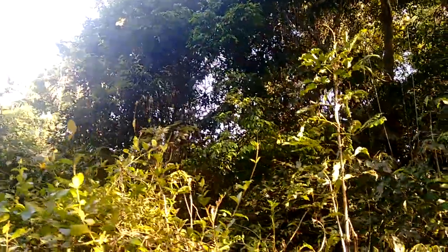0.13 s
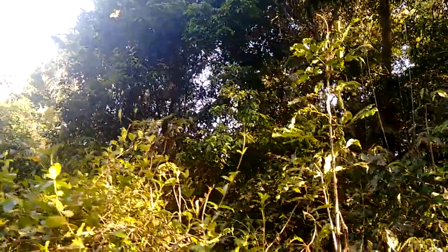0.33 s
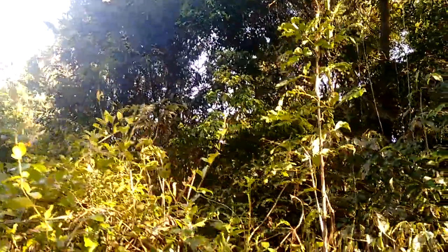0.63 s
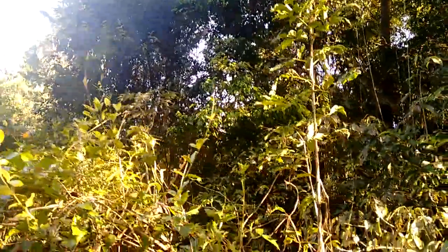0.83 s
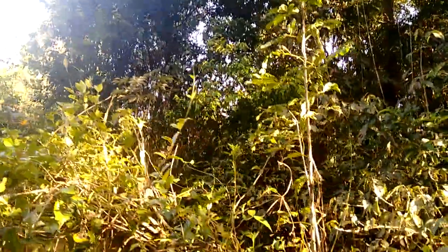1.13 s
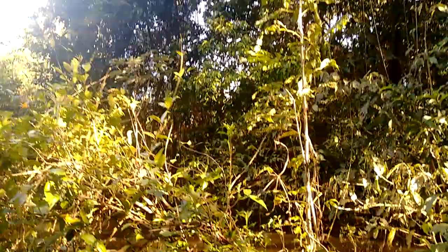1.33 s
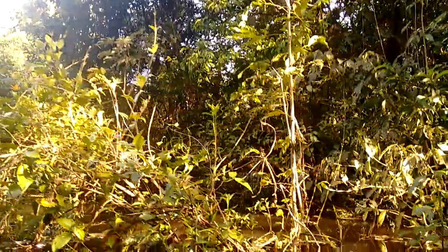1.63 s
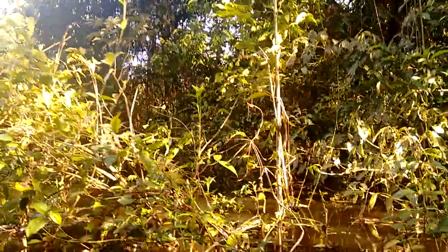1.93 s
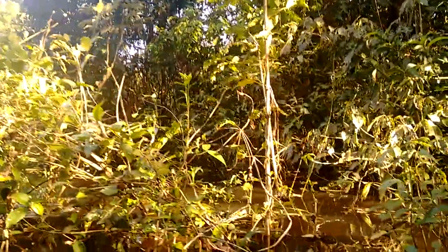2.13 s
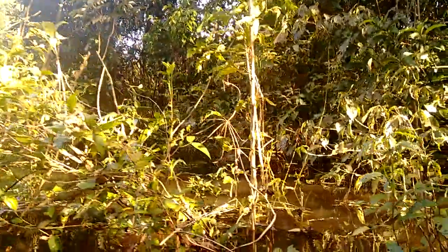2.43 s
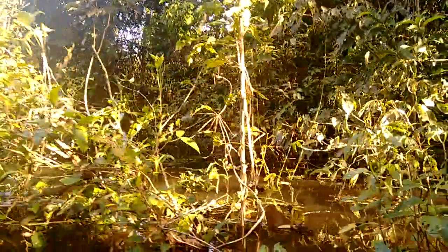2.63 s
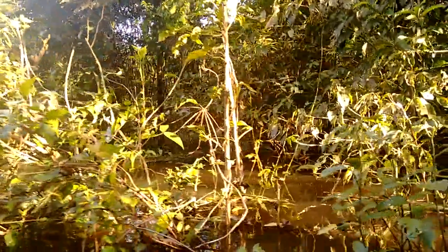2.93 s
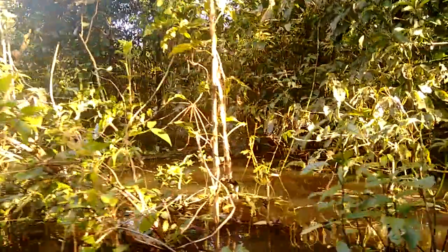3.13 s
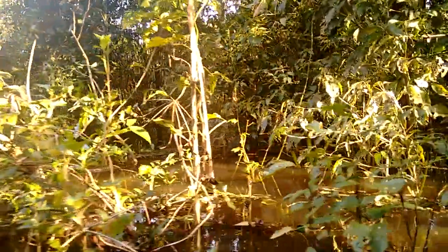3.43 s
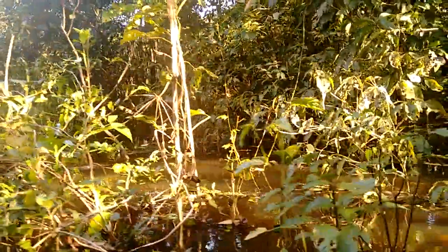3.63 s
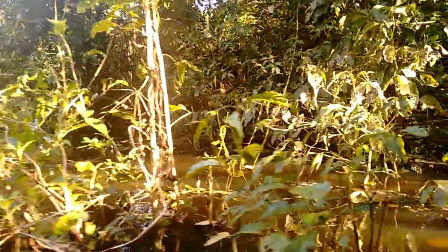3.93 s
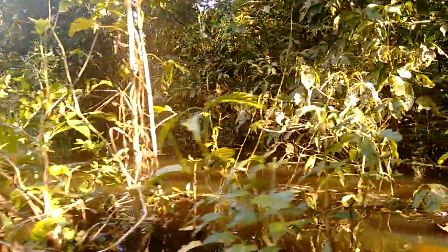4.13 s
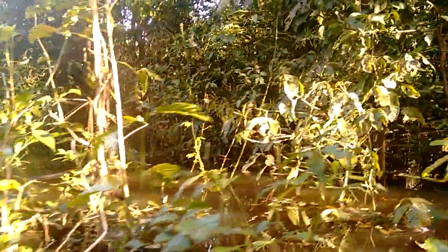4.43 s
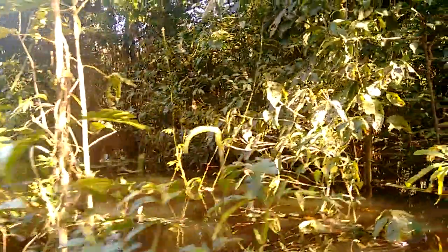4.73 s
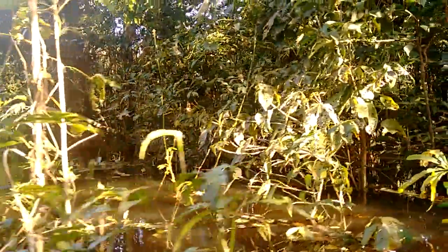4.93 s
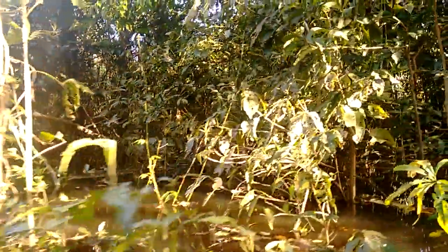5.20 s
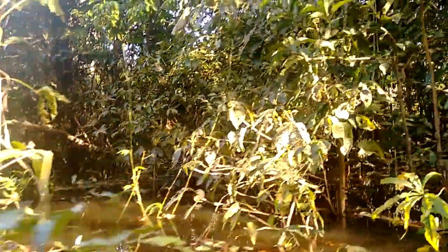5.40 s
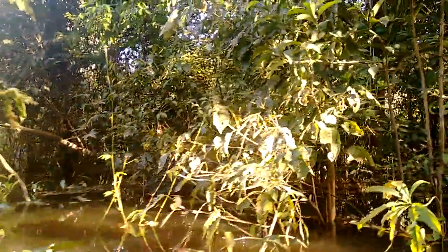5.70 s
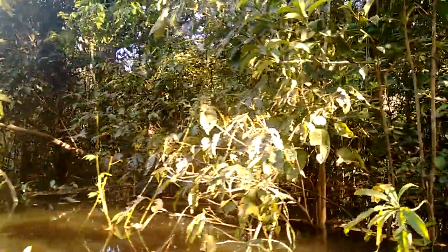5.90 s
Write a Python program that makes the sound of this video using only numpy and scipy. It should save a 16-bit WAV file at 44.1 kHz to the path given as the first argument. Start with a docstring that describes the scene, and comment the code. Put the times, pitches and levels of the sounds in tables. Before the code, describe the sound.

From a drifting boat in flooded forest, several howler monkeys roar in a low, rough, throaty chorus. It drops away within the first second, leaving thin insect shimmer, a brush of leaves, ticks and a quick cluster of wooden hull knocks. Isolated grunts return in the middle, then the roar swells strongly to the end. Low water rumble; wide stereo from close microphones, monkeys some distance off among echoing trees.

```python
"""A flooded forest, heard from a drifting boat: howler monkeys grunt and roar together.
Rough fold pulses ring through chest, throat and mouth resonances, with scatter from the trees.
Crickets and katydids are noise or tones ringing in narrow treble bands, over a hush of shaped noise.
Water rumbles low, leaves rustle as crackles, drops and twigs tick, and wood knocks ring the hull.
Two close microphone ports are widened to stereo by subtracting each, delayed, from the other."""
import sys
import numpy as np
from scipy import signal
from scipy.fft import rfft, irfft, next_fast_len
from scipy.io import wavfile
from scipy.ndimage import uniform_filter1d

SR = 44100
rng = np.random.default_rng(int(sys.argv[2]) if len(sys.argv) > 2 else 0)


def file_out(sig):
    """Save sig as 16-bit WAV at sys.argv[1]."""
    # one column per channel
    cols = np.atleast_2d(sig).T
    # limit, then scale
    lim = np.clip(cols, -1, 1)
    pcm = np.round(lim * 32767).astype(np.int16)
    wavfile.write(sys.argv[1], SR, pcm)


N = 267201

# Levels are set inside each source, ahead of port balance and port subtraction.

# Vocal tract resonances before sliding and wandering: pitch_hz, width_hz, relative level_db
CHEST_MODES = [(355.2, 77, -1.5), (403, 84, -8)]
THROAT_MODES = [(504.8, 56.6, 3.5), (624.5, 63, -5)]
MOUTH_MODES = [(739, 76, -3.5), (849, 85, 2.5), (1028, 128, -1)]
# Air sac resonance, subtracted from the chest: pitch_hz, width_hz, relative level_db
AIR_SAC_MODES = [(243.5, 80, 0)]
# Strength of the subtracted air sac: start_s, level_db
AIR_SAC_LEVEL = [(0, -1), (.6, -4.5), (2.8, -5.5), (3.7, -9.5), (5, -2), (6.06, -1)]
# Central pulse rates of three animals: pulses_per_s
FOLD_RATES = [48, 61, 75]
# The troop's steady roar fades, rests and swells again:
# start_s, chest_level_db, throat_level_db, open_mouth_level_db
ROAR_LEVELS = [(0, -38, -42, -47), (.1, -43.5, -49, -60.5), (.7, -45.5, -57.5, -57), (.98, -47.5, -51, -57),
               (1.5, -53.5, -54.5, -63.5), (1.85, -52.5, -57.5, -64.5), (2.2, -59.5, -73, -75),
               (2.55, -52.5, -54, -72.5), (3.0, -52, -65.5, -66.5), (3.7, -57.5, -59.5, -65),
               (3.95, -50.5, -68, -65), (4.22, -49, -56, -53), (4.45, -52, -53, -66),
               (4.75, -45.5, -52, -53.5), (5.1, -38, -46, -49), (5.38, -36, -41, -45),
               (5.7, -35, -43.5, -46), (6.06, -36, -44, -45)]
ROAR_CHEST_HZ = 357  # reference for the chest tuning of roar and grunts
TRACT_DRIFT = .01  # rms share by which the tract tuning wanders
# Narrow gliding rings within the howling, from chest to mouth pitch:
# start_s, length_s, first_pitch_hz, last_pitch_hz, level_db
GLIDING_RINGS = [(0.128, 0.17, 337.6, 311, -38), (.27, 0.085, 370, 390, -41), (.41, 0.068, 355, 305, -33),
                 (.49, 0.069, 345, 295, -33), (0.56, 0.18, 354, 372, -38.5), (.875, 0.056, 360, 362, -35.5),
                 (4.88, 0.19, 375, 277, -42), (5.3, 0.12, 355, 342, -33.5), (5.43, 0.069, 350, 360, -26),
                 (5.77, .06, 345, 350, -33.5), (5.98, 0.073, 365, 359, -32), (.95, 0.33, 525, 512.6, -50.5),
                 (3.609, 0.064, 935, 922, -54.5), (3.699, 0.19, 750, 953, -54.5),
                 (3.729, 0.091, 317, 266, -42), (4.1, 0.128, 1146, 1150, -54), (4.12, 0.08, 840, 858, -49),
                 (4.2, 0.092, 630, 530, -44), (4.538, 0.2, 300.5, 290, -33.5), (4.55, 0.14, 510, 512, -40),
                 (5.112, 0.074, 1085, 1075, -50.5), (5.08, 0.295, 885, 850, -44.5),
                 (5.347, .8, 1247, 1232, -63), (5.66, 0.094, 860, 887, -40), (5.8, .3, 850, 830, -41.5)]
# Chesty grunts over the roar: start_s, length_s, effort_db, swell_db over the grunt,
# chest_tuning_hz, upper_rings_db under the chest
GRUNT_EVENTS = [(0.17, 0.065, -40.5, 1, 325, -12), (0.389, 0.059, -38, -9, 335, -12.5),
                (0.465, 0.24, -39, -3, 343, -18.5), (2.7, 0.17, -45.5, -3, 349, -33),
                (3.711, 0.12, -39.5, -0.5, 309, -11), (4.048, 0.15, -37.5, -12, 306, -21),
                (4.503, 0.17, -37, -3, 310, -13), (4.825, 0.18, -38, 3, 340, -13.5)]
GRUNT_RISE_S, GRUNT_FALL_DB_PER_S, GRUNT_MOUTH_DB = 0.037, 322, -6.5

# Insect choruses: start_s, crickets_level_db, far_katydids_level_db
CHORUS_LEVELS = [(0, -45.5, -49.5), (1.9, -44.5, -48.5), (2.9, -45, -49), (3.35, -45.5, -53),
                 (4.1, -48, -58), (4.35, -46.5, -48.5), (5.3, -47, -55), (6.06, -46, -55)]
# Wing resonances, one list each for crickets, far katydids and the phrased katydid:
# pitch_hz, width_hz, relative level_db
WING_MODES = [
    [(6230, 110, -3), (5990, 300, -2), (6440, 130, -4), (6700, 50, -6)],
    [(9220, 280, 0), (9720, 160, -16)],
    [(8520, 60, -1), (8665, 60, 0)],
]
# Left over right for the same three singers: balance_db
WING_BALANCE = [-2.5, 3.5, -1.5]
# Katydid that sings in phrases: start_s, end_s
KATYDID_PHRASES = [(.05, .34), (.47, .7), (.85, 1.12), (1.2, 1.5), (1.6, 1.9), (3.98, 4.13), (4.28, 4.55),
                   (4.68, 4.95), (5.08, 5.38)]
PHRASE_DB, PAUSE_DB = -50, -80  # the phrased katydid singing and resting
# Verses of single katydids, one list a note: start_s, end_s
KATYDID_VERSES = [
    [(-1, .45), (.52, 1.97), (1.99, 3.3)],
    [(5.3, 6.5)],
    [(-1, .62), (.65, 3.18)],
    [(4.1, 5.35)],
    [(-1, .62), (1.3, 2.25), (2.3, 3.95), (4.2, 6.5)],
    [(-1, .12), (.52, 2.7), (3.05, 5.1), (5.58, 6.5)],
]
# The note each of them slides up to: pitch_hz
VERSE_NOTES = [9025, 9150, 9250, 9270, 9405, 10135]
# Breadth of each note: width_hz
VERSE_WIDTHS = [70, 50, 49.4, 60, 69.6, 105]
# Loudness of each list of verses: level_db
VERSE_LEVELS = [-46, -46, -47.5, -50.5, -50.5, -55.5]
VERSE_RISE_S, VERSE_STOP_S, VERSE_LEFT_DB = .15, .08, -2
VERSE_SLIDE, VERSE_SLIDE_S = .02, .12  # share below the note at the start, time constant of the climb
# Nearest cricket: start_s, chirps_per_s, level_db, pitch_hz
CRICKET_CHIRPS = [(0, 25.66, -52, 6205), (3.0, 25.66, -50, 6240), (3.6, 25.98, -50, 6250),
                  (4.85, 26.0, -47, 6265), (5.1, 26.55, -47, 6268), (6.06, 26.57, -45, 6280)]
CHIRP_AT_S = 5.608  # anchors the timing of the chirps

# Forest hush, far howling at the bottom and far insects at the top: pitch_hz, level_db per Hz
HUSH_SPECTRUM = [(20, -77), (90, -76), (350, -78), (1000, -91), (1400, -96), (3000, -96.5), (3900, -91.5),
                 (5500, -93.5), (5900, -82.5), (7200, -78.5), (7800, -93), (8150, -84), (8400, -88.5),
                 (9300, -72), (9900, -88.5), (10400, -102), (12300, -101), (13500, -108), (14800, -106),
                 (15030, -99), (15250, -125)]
# How alike the hush is at the two ports: pitch_hz, likeness (0 to 1)
HUSH_LIKENESS = [(30, 0), (150, 0.97), (400, 0.52), (1200, 0), (16000, 0.025)]
# Left over right in the hush: pitch_hz, balance_db
HUSH_BALANCE = [(300, 3.5), (2000, -0.5), (6000, -0.5), (8000, -2.5), (11000, -6.5), (16000, -16)]
# Water shifting under the hull: start_s, level_db
RUMBLE_LEVEL = [(0, -55), (1.1, -48.5), (1.9, -54.5), (3.3, -67), (4.2, -53.5), (5.5, -46.5)]
# Leaves brushing the boat: start_s, level_db
RUSTLE_LEVEL = [(0, -100), (.8, -63.5), (1.12, -56), (1.5, -59.5), (2.7, -97)]
# Drops and twigs ticking: start_s, peak_db at the left port, pitch_hz, t60_s
TICK_EVENTS = [(0.853, -37, 1970, 0.05), (0.863, -31.5, 4030, 0.03), (1.051, -33, 3900, .01),
               (1.098, -32, 3540, .016), (1.125, -36, 4200, .01), (3.7425, -36, 1860, 0.02),
               (4.366, -30.5, 4200, .01), (4.5145, -35, 2900, 0.03)]
# Wood knocks on the hull: start_s, first_bounce_peak_db, bounce_gap_s, brightness_db
KNOCK_EVENTS = [(1.564, -31.5, 0.0031, 8), (1.581, -22, 0.0024, -11), (1.599, -30.5, 0.0055, -9),
                (1.699, -30, 0.0035, -14), (1.7167, -27.5, .0016, 13), (1.72, -28.5, .0018, -3)]
# Ringing modes of the hull before brightness: pitch_hz, level_db, t60_s
HULL_MODES = [(292, 31, 0.015), (630, 25.5, 0.017), (949, 10.5, 0.1), (1670, -2, 0.023), (2910, 9, 0.029),
              (3860, 4, 0.018)]

PORT_DELAY_S, EDGE_HZ = 1 / 2400, 16338  # delay between the ports, upper band limit
# Delayed opposite port to subtract: pitch_hz, share (0 to 1)
PORT_CROSSFEED = [(100, 0.72), (2400, 1), (5000, 0.39), (10000, 0.027), (16000, 0.25)]


def gain_of(db):
    """dB to gain."""
    return 10 ** (np.asarray(db) / 20)


def evened(x):
    """Scales to rms 1."""
    return x / np.sqrt(np.mean(x ** 2) + 1e-20)


def read(points, hz):
    """Reads a spectrum table on a log-frequency axis."""
    f, value = np.transpose(points)
    return np.interp(np.log(hz + 1), np.log(f + 1), value)


def curves(rows):
    """Columns of a time table, one value a sample."""
    s, *columns = np.transpose(rows)
    return [np.interp(np.arange(N) / SR, s, c) for c in columns]


def add(mix, s, sound):
    """Mixes a sound in at a time."""
    part = mix[round(s * SR):][:len(sound)]
    part += sound[:len(part)]


def wander(size):
    """Slow chance of rms 1, smoothed twice over a span in samples."""
    return evened(uniform_filter1d(uniform_filter1d(rng.standard_normal(N), size), size))


def without_depths(x):
    """Rolls off below 90 Hz."""
    return signal.sosfilt(signal.butter(2, 90, "highpass", fs=SR, output="sos"), x)


def resonate(x, hz, width):
    """A steep resonance of gain 1: shift the pitch to zero, lowpass, shift back; it can follow a curve."""
    turn = np.exp(2j * np.pi * np.cumsum(hz * np.ones(N)) / SR)
    r = np.exp(-np.pi * width * 1.55 / SR)  # 1.55 makes up for the narrowing by a double pole
    low = signal.lfilter([(1 - r) ** 2], [1, -2 * r, r * r], x / turn + 1e-18)
    return 2 * (turn * low).real


def tract(x, modes, shift=1.):
    """Sum of resonances with alternate signs, rms 1."""
    rings = 0
    for k, (hz, width, db) in enumerate(modes):
        ring = resonate(x, hz * shift, width) / np.sqrt(width)
        rings = rings + (-1) ** k * gain_of(db) * ring
    return evened(rings)


def larynx(jitter, rough):
    """Three animals: uneven fold pulses, each with a puff of turbulent air."""
    out = np.zeros(N)
    for rate in FOLD_RATES:
        turns = np.cumsum(rate * np.exp(jitter * wander(size=400))) / SR
        size = gain_of(2.5 * wander(size=300))
        folds = np.diff(np.floor(turns), prepend=0)  # one click a turn
        puffs = (0.065 + np.exp(-(turns % 1) / 1.6)) * rng.standard_normal(N)
        out += size * ((1 - rough) * evened(folds) + rough * evened(puffs))
    return out


def trees(x, t60):
    """Scatter from trunks: sparse taps of random sign, other taps at each port."""
    taps = np.zeros((2, SR))
    at = np.arange(400, SR - 20, 20) + rng.integers(0, 20, (2, (SR - 401) // 20))
    np.put_along_axis(taps, at, rng.choice([-1., 1.], at.shape), 1)
    taps *= gain_of(-60 * np.arange(SR) / SR / t60)
    return signal.fftconvolve(x[None], taps / np.linalg.norm(taps[0]), axes=1)[:, :N]


def howlers():
    """Rough voices ring in chest, throat and mouth; scatter from the trees spreads them."""
    chest, throat, mouth = gain_of(curves(ROAR_LEVELS)) ** 2  # powers
    grunt, upper, tuned = grunts()
    slide = (chest * ROAR_CHEST_HZ + tuned) / (chest + grunt) / ROAR_CHEST_HZ
    voice = larynx(jitter=.25, rough=0.62)

    # the chest slides most, the throat a little; the mouth only wanders
    chest_shift = slide ** 0.71 * (1 + TRACT_DRIFT * wander(size=3000))
    throat_shift = slide ** 0.063 * (1 + TRACT_DRIFT * wander(size=3000))
    mouth_shift = 1 + TRACT_DRIFT * wander(size=3000)
    sac = gain_of(curves(AIR_SAC_LEVEL)[0]) * tract(voice, AIR_SAC_MODES, chest_shift)
    body = tract(voice, CHEST_MODES, chest_shift) - sac

    near = np.sqrt(chest + grunt) * body
    near += np.sqrt(throat + upper) * tract(voice, THROAT_MODES, throat_shift)
    mouth_power = mouth + upper * gain_of(2 * GRUNT_MOUTH_DB)
    near += np.sqrt(mouth_power) * tract(voice, MOUTH_MODES, mouth_shift)
    near = without_depths(near + gliding_rings())

    both, apart = trees(near, t60=0.36)
    for _ in range(2):  # close ports differ more at shorter wavelengths
        apart = signal.lfilter([1, -.94], 1, apart)
    return near * gain_of([[.6], [-.6]]) + gain_of(-8.5) * both + gain_of(27.0) * apart * [[1], [-1]]


def insects():
    """Many wings scrape at random, unlike at the two ports, and ring in narrow bands."""
    t, half = np.arange(N) / SR, np.array([[.5], [-.5]])
    singing = sum(1. * (t >= a) * (t < b) for a, b in KATYDID_PHRASES)
    singing = uniform_filter1d(singing, size=1500)
    levels = curves(CHORUS_LEVELS) + [PAUSE_DB + (PHRASE_DB - PAUSE_DB) * singing]
    scrape, wings = (rng.standard_normal((2, N)) * gain_of(0.38 * wander(size=150)) for _ in range(2))
    out = gain_of(VERSE_LEFT_DB * half) * verses(wings)
    for level_db, modes, left_db in zip(levels, WING_MODES, WING_BALANCE):
        out += gain_of(level_db + left_db * half) * tract(scrape, modes)
    return out


def verses(scrape):
    """Single katydids: each verse rings one narrow wing note that climbs into place and stops short."""
    out, t = np.zeros((2, N)), np.arange(N) / SR
    for hz, width, db, rows in zip(VERSE_NOTES, VERSE_WIDTHS, VERSE_LEVELS, KATYDID_VERSES):
        size, flat = np.zeros((2, N))
        for start, end in rows:
            shape = np.clip(np.minimum((t - start) / VERSE_RISE_S, (end - t) / VERSE_STOP_S), 0, 1)
            size += shape
            flat += (shape > 0) * VERSE_SLIDE * np.exp(-np.maximum(t - start, 0) / VERSE_SLIDE_S)
        out += gain_of(db) * size * tract(scrape, [(hz, width, 0)], 1 - flat)
    return out


def cricket():
    """Each chirp is a run of wing strokes that grows to a strong one, then drops off fast."""
    rate, level_db, hz = curves(CRICKET_CHIRPS)
    turns = np.cumsum(rate) / SR
    before = (turns[round(CHIRP_AT_S * SR)] - turns + 0.05) % 1  # share of a chirp left to its peak
    swell = np.exp(-before / .2) + np.exp((before - 1) / .07)
    strokes = swell * (1 + .6 * np.cos(2 * np.pi * (before - .06) * 6))  # six a chirp
    tone = np.cos(2 * np.pi * np.cumsum(hz + 65 * wander(size=200)) / SR)
    uneven = gain_of(0.5 * wander(size=1500))
    song = gain_of(level_db) * evened(resonate(tone * strokes * uneven, hz, 210))
    return song + gain_of(-9) * trees(song, t60=0.08)


def hush():
    """Random short-time spectra with drifting patches, alike at both ports in the bass."""
    frames, hz = N // 256 + 5, np.fft.rfftfreq(1024, 1 / SR)
    a, b, c, d, patches = rng.standard_normal((frames, 513, 5)).T
    patches = evened(uniform_filter1d(uniform_filter1d(patches, 12, 0), 8, 1))
    patch_db = read([(9000, 2.07), (11000, 0.75)], hz)[:, None] * patches  # (Hz, rms dB)

    same, left = np.clip(read(HUSH_LIKENESS, hz), -1, 1)[:, None], a + 1j * b
    right = same * left + np.sqrt(1 - same ** 2) * (c + 1j * d)
    z = np.array([left, right])
    per_hz = np.sqrt(SR / 1024)
    z *= per_hz * gain_of(read(HUSH_SPECTRUM, hz)[:, None] + patch_db)
    z *= gain_of(read(HUSH_BALANCE, hz)[:, None] * np.array([.5, -.5])[:, None, None])
    return signal.istft(z, nperseg=1024, noverlap=768)[1][:, :N]


def rumble():
    """Water under the hull: lumpy low noise, nearly alike at both ports."""
    both, apart = (tract(rng.standard_normal(N), [(137, 174, 0)]) for _ in range(2))
    return gain_of(curves(RUMBLE_LEVEL)[0]) * (both + 0.096 * apart * np.array([[1], [-1]]))


def gliding_rings():
    """Narrow rings within the howling: gliding tones with soft ends, pitch and strength both shaking."""
    out, unsteady, hoarse = np.zeros(N), wander(size=150), wander(size=250)
    for s, length, first_hz, last_hz, db in GLIDING_RINGS:
        shake, throb = (v[round(s * SR):][:round(length * SR)] for v in (unsteady, hoarse))
        hz = np.linspace(first_hz, last_hz, len(shake)) * (1 + 0.024 * shake)
        tone = np.sin(2 * np.pi * np.cumsum(hz) / SR)
        add(out, s, gain_of(db + 3.25 * throb) * tone * signal.windows.tukey(len(hz), .6))
    return out


def grunts():
    """Each grunt rises fast, swells or sags, and dies away: chest power, upper power, weighted tuning."""
    t, chest, upper, tuned = np.arange(N) / SR, *np.zeros((3, N))
    for s, length, effort_db, swell_db, hz, upper_db in GRUNT_EVENTS:
        rise = np.clip((t - s) / GRUNT_RISE_S, 0, 1)
        shape_db = swell_db * (np.clip((t - s) / length, 0, 1) - .5)
        shape_db -= GRUNT_FALL_DB_PER_S * np.maximum(t - s - length, 0)
        power = (rise * gain_of(effort_db + shape_db)) ** 2
        chest = chest + power
        upper = upper + power * gain_of(2 * upper_db)
        tuned = tuned + power * hz
    return chest, upper, tuned


def rustle():
    """Leaves: dense soft crackles of uneven size, different at each port."""
    grains = (rng.random((2, N)) < 1500 / SR) * rng.standard_normal((2, N))  # 1500 a second
    grains = grains * gain_of(3.2 * wander(size=700))
    band = signal.butter(2, [1800, 4300], "bandpass", fs=SR, output="sos")
    return gain_of(curves(RUSTLE_LEVEL)[0]) * evened(signal.sosfilt(band, grains))


def ticks():
    """Drops and twigs: short broad clicks around a pitch, nearer the left port."""
    out, t = np.zeros((2, N)), np.arange(1500) / SR
    noises = rng.standard_normal((len(TICK_EVENTS), len(t)))
    for (s, peak_db, hz, t60), noise in zip(TICK_EVENTS, noises):
        band = signal.butter(2, [hz / 1.4, hz * 1.4], "bandpass", fs=SR, output="sos")
        click = signal.sosfilt(band, noise * gain_of(-60 * t / t60))
        click *= gain_of(peak_db) / abs(click).max()
        add(out[0], s, click)
        add(out[1], s + .0001, gain_of(-12) * click)
    return out


def hull():
    """Each knock cracks, bounces a few times and rings the hull modes; brightness tilts the upper ones."""
    out, t = np.zeros(N), np.arange(3000) / SR
    band = signal.butter(2, [250, 4200], "bandpass", fs=SR, output="sos")
    noises = rng.standard_normal((len(KNOCK_EVENTS), len(t)))
    for (s, peak_db, gap, bright_db), noise in zip(KNOCK_EVENTS, noises):
        ring = gain_of(bright_db + 25.5 - 60 * t / 0.021) * signal.sosfilt(band, noise)  # the crack
        for hz, db, t60 in HULL_MODES:
            tilt_db = bright_db * np.log2(hz / HULL_MODES[0][0]) / 3
            ring += gain_of(db + tilt_db - 60 * t / t60) * np.sin(2 * np.pi * hz * t)
        ring /= abs(ring).max()
        for k in range(4):
            add(out, s + k ** 1.25 * gap, gain_of(peak_db - 2.5 * k) * ring)
    out = without_depths(out)
    # from the left, so later and softer on the right
    return np.array([out, np.roll(out, shift=4)]) * gain_of([[3.5], [-3.5]])


def scene():
    """All sources at the two ports."""
    return howlers() + insects() + cricket() + hush() + rumble() + rustle() + ticks() + hull()


def record(dry):
    """Each port minus the delayed other port, which combs sum and difference; then the band limit."""
    size = next_fast_len(N + 64)
    hz, z = np.fft.rfftfreq(size, 1 / SR), rfft(dry, size)
    delay = np.exp(-2j * np.pi * hz * PORT_DELAY_S)
    cross = np.clip(read(PORT_CROSSFEED, hz), 0, 1) * delay
    wide = irfft(z - cross * z[::-1], size)[:, :N]
    edge = signal.firwin(511, EDGE_HZ, window=("kaiser", 9), fs=SR)
    return signal.oaconvolve(wide, edge[None], "same")


dry = scene()
out = record(dry)
file_out(out)
```